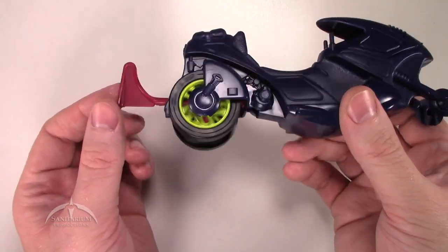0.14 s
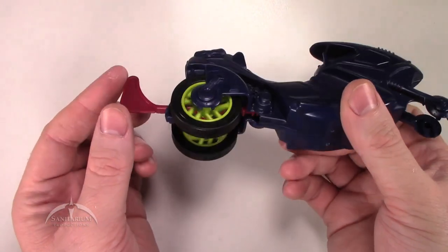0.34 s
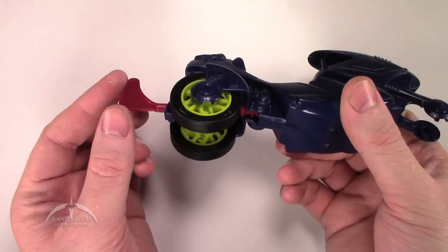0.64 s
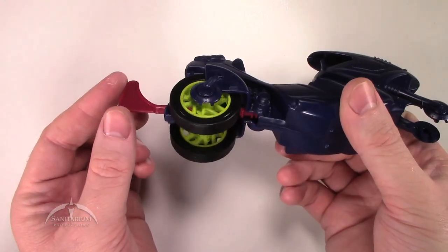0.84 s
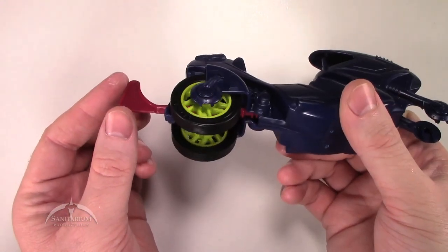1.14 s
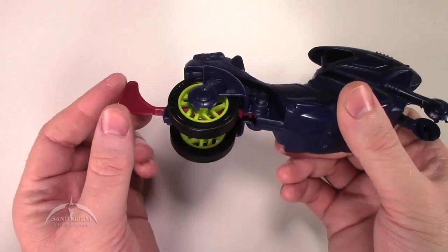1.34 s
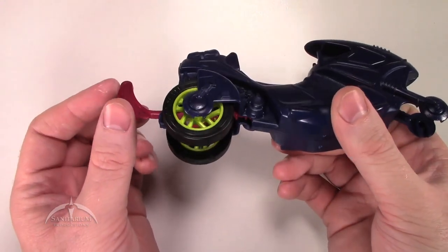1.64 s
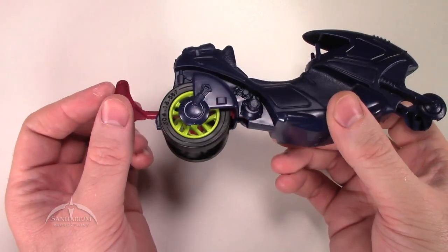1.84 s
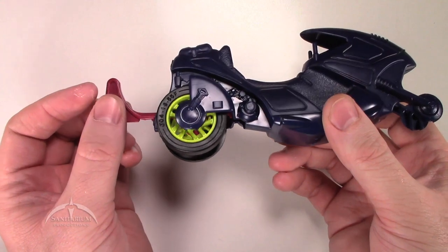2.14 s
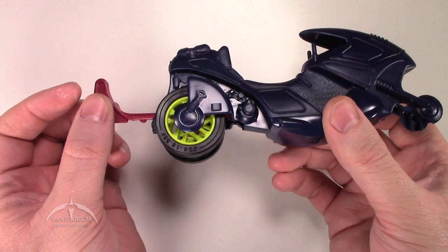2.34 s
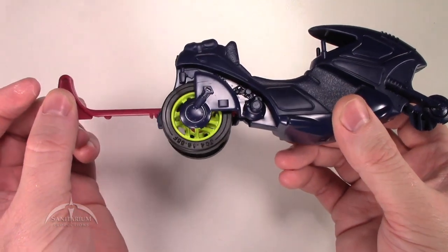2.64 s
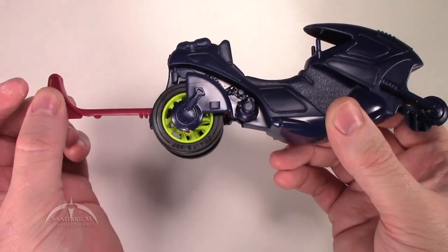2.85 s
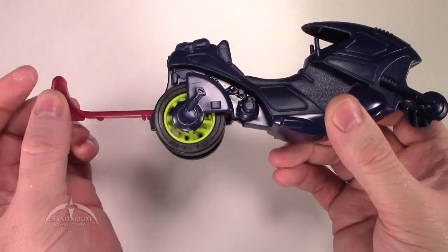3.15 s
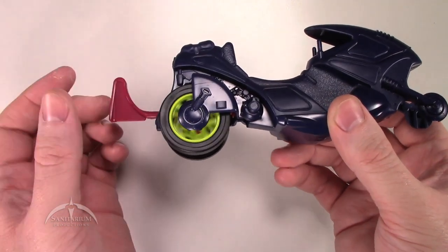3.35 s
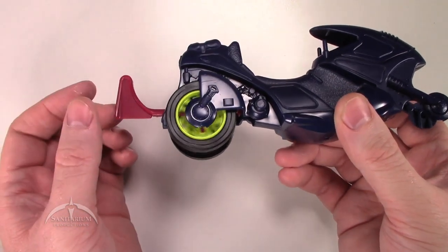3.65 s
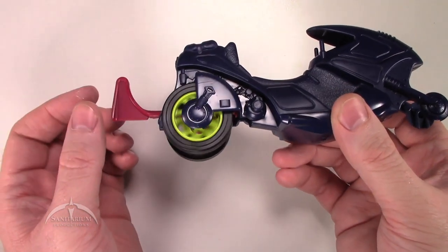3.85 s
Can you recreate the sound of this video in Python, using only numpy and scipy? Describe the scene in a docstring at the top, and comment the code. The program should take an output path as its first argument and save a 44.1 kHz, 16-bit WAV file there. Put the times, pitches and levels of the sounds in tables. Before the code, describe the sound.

Close up in a small quiet room, toy gears slow with uneven ratchet clicks, then two small groups of plastic knocks, a brief rising squeak, a loud snap and a rough, fast, pulsing gear whir over faint hiss.

```python
"""Gears of a hollow plastic toy motorbike rattle and fade amid single ratchet clicks, in a quiet small room.
The toothed ripcord then rubs and squeaks along its slot, with two groups of knocks, and snaps home.
The wheel spins on, its loose gears chattering hardest once or twice a turn, over a faint steady hiss.
Tooth contacts are jittered pulse trains with gritty noise; they excite the decaying modes of the shell."""
import sys
import numpy as np
from scipy import signal
from scipy.fft import rfft, irfft
from scipy.io import wavfile
from scipy.ndimage import uniform_filter1d

SR = 44100
rng = np.random.default_rng(int(sys.argv[2]) if len(sys.argv) > 2 else 0)


def transcribe(u):
    """Save the signal u as a 16-bit wav file named by the first command-line argument.

    u: samples, shape (n,) or (channels, n), limited to [-1, 1]; the rate is SR.
    q: integer samples, one column per channel.
    """
    v = np.clip(np.atleast_2d(u).T, -1, 1)
    q = np.round(v * 32767).astype(np.int16)
    wavfile.write(sys.argv[1], SR, q)


N = 176400
T = np.arange(N) / SR


def amp(db):
    """Amplitude ratio: 20 dB is a factor of ten."""
    return 10 ** (np.asarray(db) / 20)


def unit(x):
    """Normalisation to an rms of 1."""
    return x / np.sqrt(np.mean(x ** 2))


def curve(points):
    """Envelope: gain interpolated in dB along (s, dB) points, silent outside them."""
    s, db = np.array(points).T
    return amp(np.interp(T, s, db, left=-200, right=-200))


def fade(t, t60):
    """Exponential decay of a damped system, falling 60 dB in t60 seconds."""
    return np.exp(-np.log(1000) * t / t60)


def through(x, response):
    """Linear filtering: convolution with an impulse response."""
    return signal.fftconvolve(x, response)[:len(x)]


def colour(points, size=4096):
    """Minimum-phase impulse response of a (Hz, dB) spectrum, by folding its cepstrum."""
    hz, db = np.array(points).T
    f = np.maximum(np.arange(size // 2 + 1) * SR / size, 1)
    below = np.clip(f / hz[0], .1, 1) ** 2  # 12 dB per octave roll-off under the first point
    gain = amp(np.interp(np.log(f), np.log(hz), db))
    cepstrum = irfft(np.log(below * gain))
    cepstrum[1:size // 2] *= 2
    cepstrum[size // 2 + 1:] = 0
    return irfft(np.exp(rfft(cepstrum)))


def air():
    """Stationary noise: Gaussian noise shaped by a fixed spectrum gives the quiet hiss."""
    # Spectrum of the hiss. Each row: frequency in Hz, relative level in dB.
    air_spectrum = [(15, -36), (25, -6), (129, -3), (240, -9), (410, -11), (598, -13), (826, -11),
                    (2360, -18.5), (13200, -21.5), (15500, -26)]
    level_db = -68.5
    return amp(level_db) * unit(through(rng.standard_normal(N), colour(air_spectrum)))


def room(x, size=22050):
    """Reverberation: table and walls return a diffuse tail whose lower part dies away sooner."""
    low_t60_s, full_band_t60_s, tail_db = 0.2, 0.38, -13
    t = T[:size]
    noise = rng.standard_normal(size)
    low = signal.sosfilt(signal.butter(2, 4500, fs=SR, output="sos"), noise)
    full_band = rng.standard_normal(size)
    tail = low * fade(t, low_t60_s) + .5 * full_band * fade(t, full_band_t60_s)
    tail = tail * (1 - np.exp(-t / 0.0033))  # the tail builds up over a few milliseconds
    return x + amp(tail_db) * through(x, tail / np.linalg.norm(tail))


def shell(points, size=8192):
    """Modal response: one contact gives a click and damped modes, shifted a little by where it lands."""
    # Modes of the plastic shell. Each row: frequency in Hz, t60 in seconds,
    # spectral peak over the plain click in dB (frequency and peak before scatter and colouring).
    shell_modes = [(832, 0.1, 6.5), (1024, .045, 4), (1595, 0.089, 7), (1760, 0.14, 8), (1828, 0.22, 10.5),
                   (2156, 0.12, 7.5), (2302.6, 0.065, 5.5), (2479, 0.087, 3.5), (3134, 0.044, 7.5),
                   (3326, 0.087, 1), (3577, 0.055, -1.5), (3916, 0.019, -7), (4116, 0.038, 8),
                   (5170, 0.087, 10.5), (5590, 0.058, -1), (6084, 0.05, 2), (10490, 0.0044, 11.5),
                   (11830, .015, 4.5), (13900, .01, 6)]
    detune, scatter_db = 0.0058, 2.5  # standard deviations: fraction of frequency, dB
    t = T[:size]
    ring = signal.unit_impulse(size)
    places = rng.standard_normal((len(shell_modes), 2))
    for (hz, t60, db), (shift, weight) in zip(shell_modes, places):
        mode = fade(t, t60) * np.cos(2 * np.pi * hz * (1 + detune * shift) * t)
        peak_scale = 2 * np.log(1000) / (t60 * SR)  # gives each mode a spectral peak of 1
        ring = ring + amp(db + scatter_db * weight) * peak_scale * mode
    body = through(ring, colour(points))
    return body / np.linalg.norm(body)


def rattle(contacts, points, count=6):
    """Multipoint excitation: contacts hop between places on the shell every few milliseconds."""
    place = np.repeat(rng.integers(0, count, N // 200 + 1), 200)[:N]
    return sum(through(contacts * (place == k), shell(points)) for k in range(count))


def teeth(rate, jitter, scatter_db, grit):
    """Jittered pulse train: each uneven tooth contact is a click and a short gritty buzz."""
    contact_t60_s = 0.026
    slip, size = rng.standard_normal((4000, 2)).T
    count = np.arange(len(slip))
    # a contact falls where the running tooth count passes a whole number, plus its slip
    at = np.searchsorted(np.cumsum(rate) / SR, count + jitter * slip)
    strength = amp(scatter_db * np.clip(size, -2, 2))
    clicks = np.bincount(at, strength, N + 1)[:N]
    buzz_envelope = through(clicks, fade(T, contact_t60_s) * (1 - np.exp(-T / 0.0006)))
    buzz = buzz_envelope * rng.standard_normal(N)
    return unit(unit(clicks) + grit * unit(buzz))


def flicker(x, depth_db, rate_hz, count=9):
    """Band modulation: contacts favour changing parts of the spectrum; slower power swings are evened."""
    spectrum, out = rfft(x), 0
    hz = np.arange(len(spectrum)) * SR / N
    place = np.interp(hz, np.geomspace(600, 14000, count), np.arange(count))
    for k in range(count):
        steps_db = depth_db * np.clip(rng.standard_normal(2000), -2, 2)
        wander_db = np.interp(T * rate_hz, np.arange(2000), steps_db)
        band = irfft(spectrum * np.maximum(1 - np.abs(place - k), 0), N) * amp(wander_db)
        power = uniform_filter1d(band ** 2, 900) / np.mean(band ** 2)  # over about 20 ms
        out = out + band / np.sqrt(np.abs(power) + .15)
    return unit(out)


def blows(table, points, chatter, chatter_t60, size=8192):
    """Impact excitation: a contact and its quick chatter ring the shell; levels are rms over 10 ms."""
    chatter_rise_s = 0.0037
    out, t = np.zeros(N + size), T[:size]
    for s, db, treble_db in table:
        buzz = rng.standard_normal(size) * fade(t, chatter_t60) * (1 - np.exp(-t / chatter_rise_s))
        contact = signal.unit_impulse(size) + chatter * buzz / np.linalg.norm(buzz)
        hit = through(contact, shell(points))
        hit = through(hit, colour([(20, 0.011), (2500, 0.0029), (6000, treble_db)]))
        i = int(s * SR)
        out[i:i + size] += amp(db) * hit / np.linalg.norm(hit) * np.sqrt(SR / 100)
    return out[:N]


def hollow_body():
    """Cavity resonance: some of the blows set off a short, damped, low note of the hollow body."""
    # Notes of the body. Each row: start in seconds, frequency in Hz, t60 in seconds,
    # nominal level in dB (before the onset shape and a factor of two).
    thumps = [(.833, 440, .08, -56), (2.159, 760, 0.035, -35.5), (2.561, 830, .09, -48),
              (2.600, 530, .06, -51), (3.243, 190, .05, -49)]
    out = 0
    for s, hz, t60, db in thumps:
        t = np.maximum(T - s, 0)
        onset = (1 - np.exp(-t / .002)) ** 2
        out = out + amp(db) * fade(t, t60) * onset * 2 * np.sin(2 * np.pi * hz * t)
    return out


def slowing_gears():
    """Repeated impact: teeth meet ever more slowly in a fading rattle with ratchet clicks."""
    # Ratchet clicks. Each row: start in seconds, level in dB, treble tilt at 6 kHz and above in dB.
    ratchet_clicks = [(.011, -45.5, 6), (.071, -37, 4), (.114, -38, 9), (.177, -37.5, 26), (.192, -32, -2),
                      (.217, -32.5, -8), (.244, -43, -5), (.271, -40, 0), (.321, -33, -3), (.337, -36, 9),
                      (.371, -41, 10), (.388, -35.5, 9), (.395, -31.5, -17), (.467, -33, 10),
                      (.482, -32, 5.5), (.508, -37, -2), (.547, -32, 0), (.584, -39.5, -39), (.64, -32, 5),
                      (.667, -34, 5.5), (.687, -32.5, 6.5), (.695, -38, 0), (.715, -34.5, 12),
                      (.744, -30.5, 1.5), (.774, -39, -9), (.802, -37, 1.5), (.831, -32.5, 10.5),
                      (.839, -32, -4), (.869, -33, 8.5), (.912, -36.5, 1), (.962, -55, 32), (.97, -35, 4)]
    # Gear rattle, then the bright scrape of teeth meshing. Each row: time in seconds, drive level in dB.
    rattle_level = [(0, -47), (.055, -54.5), (.08, -46), (.165, -40), (.19, -31), (.28, -36), (.45, -38),
                    (.6, -38.5), (.8, -50.5), (.89, -41), (.95, -55), (1.0, -50.5), (1.07, -85)]
    scrape_level = [(.14, -74), (.185, -43), (.22, -40), (.26, -50.5), (.38, -71.5)]
    # Spectra of rattle and scrape. Each row: frequency in Hz, relative level in dB.
    rattle_spectrum = [(280, -39), (480, -31.5), (680, -11.5), (1000, -7), (1330, -20.5), (1550, -9),
                       (1800, -6.5), (2350, 4.5), (2750, -3), (4050, -6.5), (4600, -18.5), (5600, -19),
                       (7000, -45.5), (12000, -66.5)]
    scrape_spectrum = [(1500, -37), (4000, 5.5), (5500, -0.5), (7800, -5.5), (9000, -16.5), (10800, -10),
                       (15000, -28.5)]
    tooth_hz, slowing_per_s = 173.5, .7
    rate = tooth_hz * np.exp(-slowing_per_s * T)
    contacts = flicker(teeth(rate, jitter=0.49, scatter_db=0.55, grit=1.2), depth_db=2.0, rate_hz=210)
    contacts = contacts / np.std(contacts[:SR])  # level set over the first second
    clicks = blows(ratchet_clicks, rattle_spectrum, chatter=3.4, chatter_t60=0.025)
    rattling = rattle(contacts, rattle_spectrum) * curve(rattle_level)
    scrape = rattle(contacts, scrape_spectrum) * curve(scrape_level)
    return rattling + scrape + clicks


def ripcord():
    """Friction and impact: the cord rubs, squeaks and knocks along its slot, then snaps home."""
    # Knocks in the slot, then the handle snapping home and bouncing.
    # Each row: start in seconds, level in dB, treble tilt at 6 kHz and above in dB.
    slot_knocks = [(2.151, -69, 14), (2.156, -31, -9), (2.1605, -28, 0), (2.181, -56, -26),
                   (2.187, -57, -30), (2.556, -39.5, -4), (2.6005, -35.5, -1)]
    handle_snap = [(3.2415, -17.5, 6.5), (3.2455, -16.5, -9.5), (3.2495, -20.5, -12)]
    # Cord sliding in its slot. Each row: time in seconds, rms level in dB.
    slide_level = [(1.85, -85), (1.92, -66), (1.98, -106), (2.09, -76), (2.15, -52), (2.27, -93),
                   (2.32, -70), (2.38, -69), (2.43, -86), (2.51, -69), (2.545, -49.5), (2.57, -42),
                   (2.63, -51), (2.74, -88), (2.84, -81), (2.89, -67), (2.95, -88)]
    # Squeaks. Each row: centre in seconds, frequency in Hz, half length to 1/e in seconds, peak rms in dB.
    squeaks = [(1.189, 2123, 0.02, -60), (1.922, 2400, .025, -67), (2.188, 2320, 0.006, -37),
               (2.24, 3680, .03, -71), (2.322, 3250, .035, -63.5), (2.326, 2350, 0.015, -59.5),
               (2.382, 2290, 0.019, -61.5), (2.499, 3100, 0.034, -65.5), (2.507, 4050, 0.035, -67.5),
               (2.523, 2280, 0.0096, -55), (2.573, 10620, .04, -66), (2.888, 2325, 0.018, -63.5),
               (3.14, 3360, .02, -58), (3.168, 2337, 0.024, -50), (3.199, 3365, 0.021, -36)]
    # Spectra of sliding and knocks, then of the snap. Each row: frequency in Hz, relative level in dB.
    slot_spectrum = [(250, -50), (500, -32.5), (750, -11.5), (1300, -23), (1650, -9.5), (2300, 2),
                     (2900, -2.5), (3700, -4.5), (4800, -16.5), (6000, -20.5), (7500, -46), (15000, -64)]
    snap_spectrum = [(250, -27.5), (550, -24), (820, -4), (1400, -21.5), (2400, -10), (3250, 12.5),
                     (4300, -5.5), (6000, -2), (8500, -13), (10500, -22), (15000, -24)]
    waver_hz = 34.9  # rms frequency deviation of a squeak
    out = unit(rattle(rng.standard_normal(N), slot_spectrum)) * curve(slide_level)
    for s, hz, length, db in squeaks:
        waver = unit(uniform_filter1d(rng.standard_normal(N), 300))
        phase = 2 * np.pi * np.cumsum(hz + waver_hz * waver) / SR
        envelope = np.exp(-((T - s) / length) ** 2)
        out = out + amp(db) * envelope * np.sqrt(2) * np.sin(phase)
    knocks = blows(slot_knocks, slot_spectrum, chatter=1.85, chatter_t60=0.025)
    snap = blows(handle_snap, snap_spectrum, chatter=2.9, chatter_t60=0.013)
    return out + knocks + snap


def spinning_wheel():
    """Amplitude-modulated impacts: fast tooth contacts swell at the tight spots of each wheel turn."""
    # Tight spots, one or two in each turn. Each row: peak in seconds, drive level in dB, rise in seconds.
    tight_spots = [(3.28, -19, 0.013), (3.326, -20, 0.021), (3.391, -20.5, 0.022), (3.442, -20.5, 0.011),
                   (3.501, -21.5, 0.03), (3.544, -20, 0.0084), (3.614, -20.5, 0.018), (3.681, -20, 0.015),
                   (3.729, -20.5, 0.0029), (3.745, -22, 0.0096), (3.793, -22, 0.0033), (3.811, -18, 0.015),
                   (3.879, -17, .014), (3.948, -17.5, 0.012), (4.015, -20, 0.019)]
    # Gear whir, swelling up to the push, dipping, then returning.
    # Each row: time in seconds, drive level in dB.
    whir_level = [(3.09, -75), (3.14, -59.5), (3.19, -33.5), (3.23, -27.5), (3.3, -42), (3.6, -32),
                  (4, -35.5)]
    # Spectrum of the spin. Each row: frequency in Hz, relative level in dB.
    spin_spectrum = [(150, -80), (250, -40), (347, -49.5), (420, -24.5), (823, -13), (1330, -17.5),
                     (1790, -9), (1990, -8), (2360, 1), (2900, -4.5), (3220, -2), (4710, -14.5),
                     (6210, -16.5), (6880, -23), (9720, -33), (10600, -27), (15500, -50.5)]
    tooth_hz, slowing_per_s, push_s = 329.2, .35, 3.24  # the rate falls after the push
    fall_s = 0.017
    rate = tooth_hz * np.exp(-slowing_per_s * np.maximum(T - push_s, 0))
    contacts = flicker(teeth(rate, jitter=0.31, scatter_db=1.75, grit=2.1), depth_db=2.5, rate_hz=150)
    power = curve(whir_level) ** 2
    for s, db, rise in tight_spots:
        swell = np.exp(-np.maximum((s - T) / rise, (T - s) / fall_s))
        power = power + (amp(db) * swell) ** 2
    return rattle(contacts * np.sqrt(power), spin_spectrum)


def scene():
    """Superposition: the toy's sounds share one room response, and the hiss is added."""
    toy = slowing_gears() + ripcord() + hollow_body() + spinning_wheel()
    return (room(toy) + air())[None]


def record(dry):
    """Band limiting: a steep elliptic low-pass removes the top of the spectrum."""
    top_hz = 15600
    return signal.sosfilt(signal.ellip(8, .2, 70, top_hz, fs=SR, output="sos"), dry)


dry = scene()
out = record(dry)
transcribe(out)
```